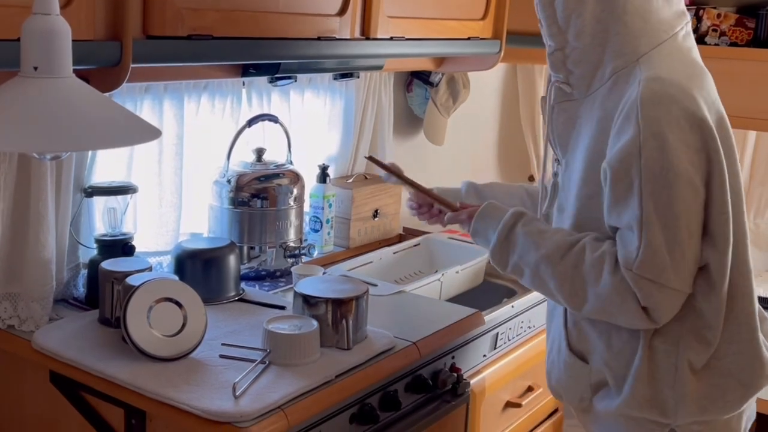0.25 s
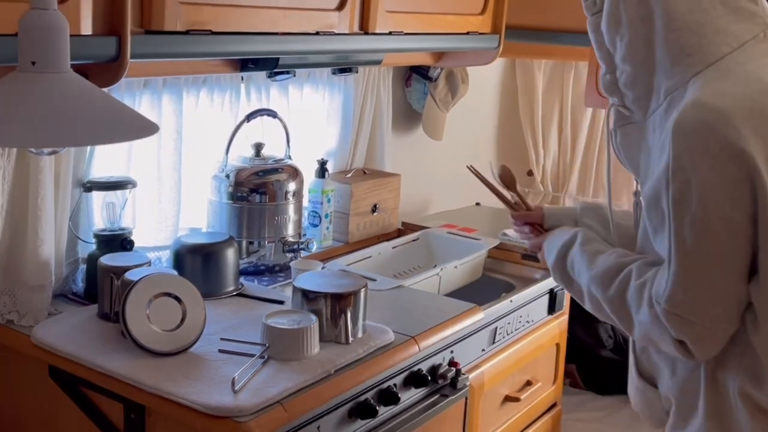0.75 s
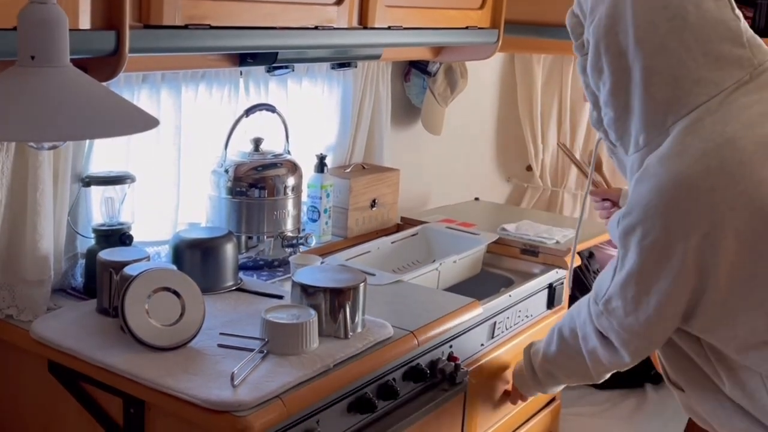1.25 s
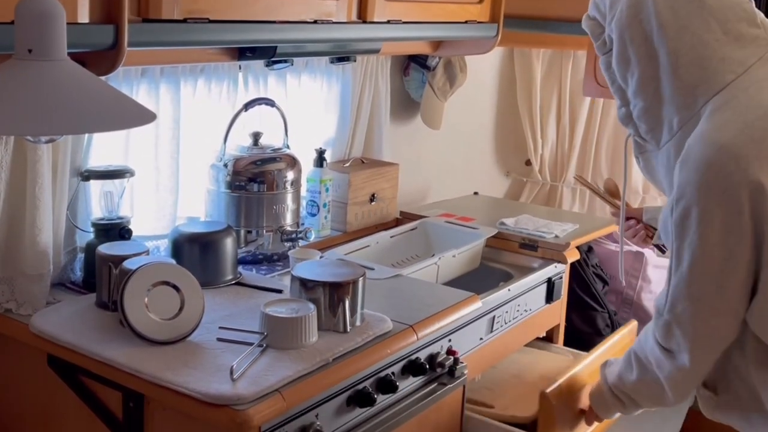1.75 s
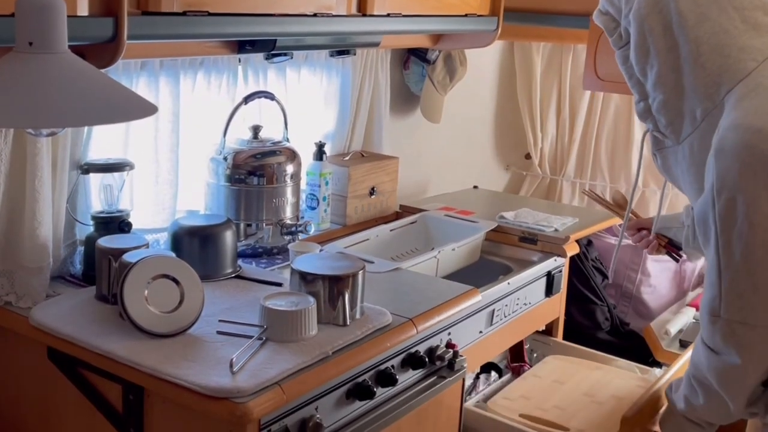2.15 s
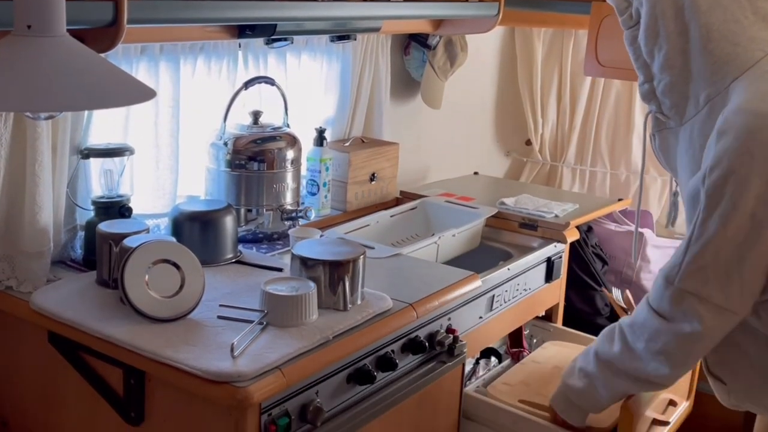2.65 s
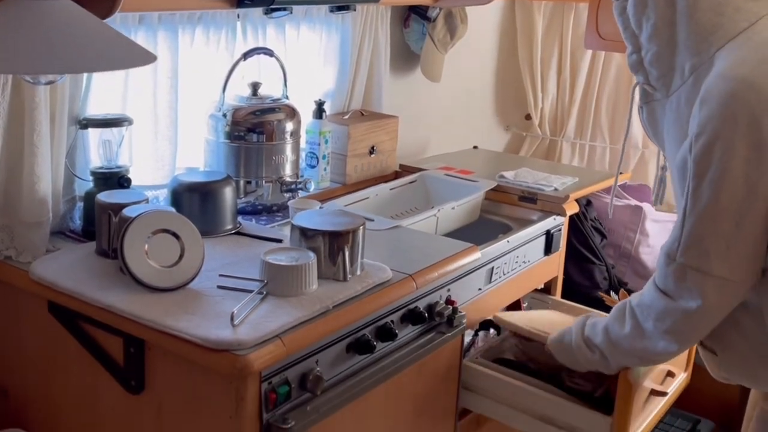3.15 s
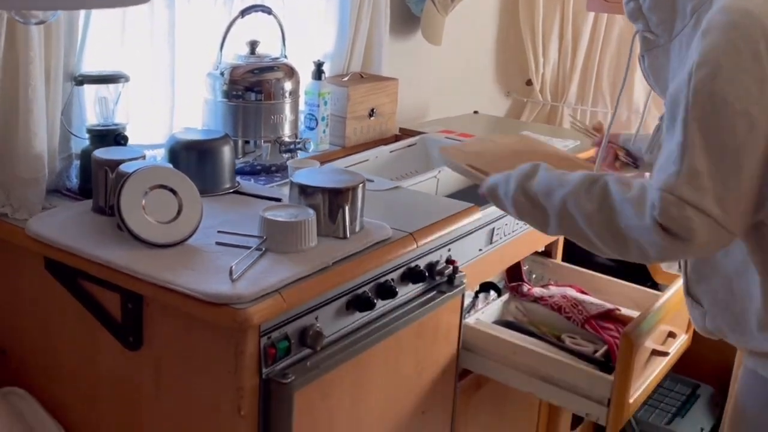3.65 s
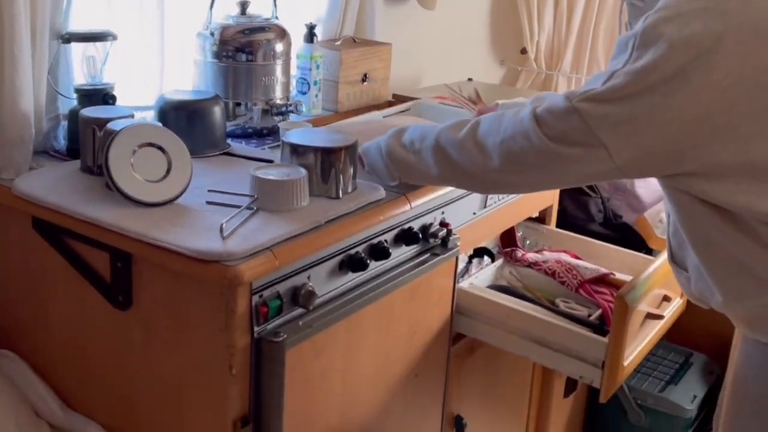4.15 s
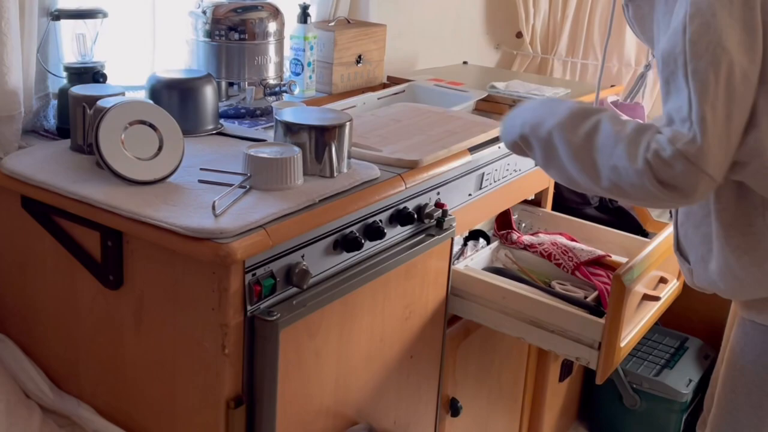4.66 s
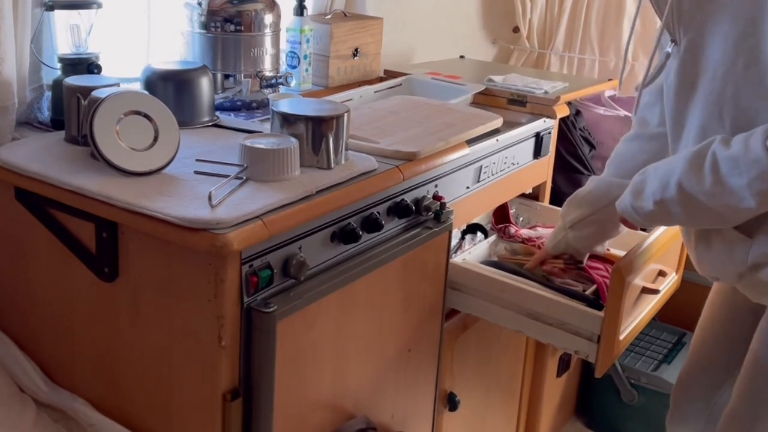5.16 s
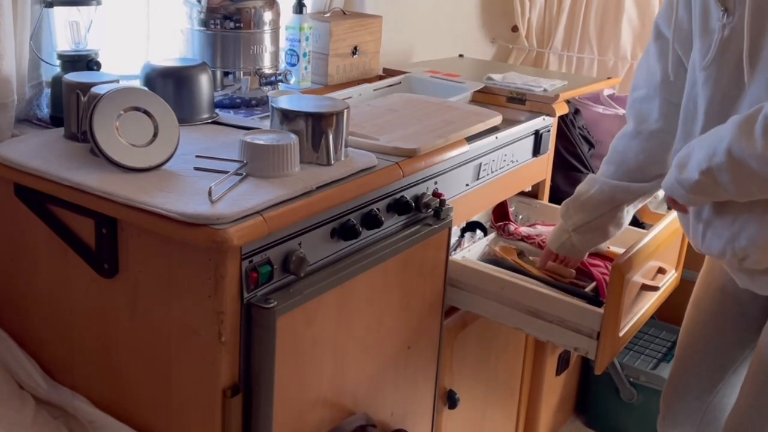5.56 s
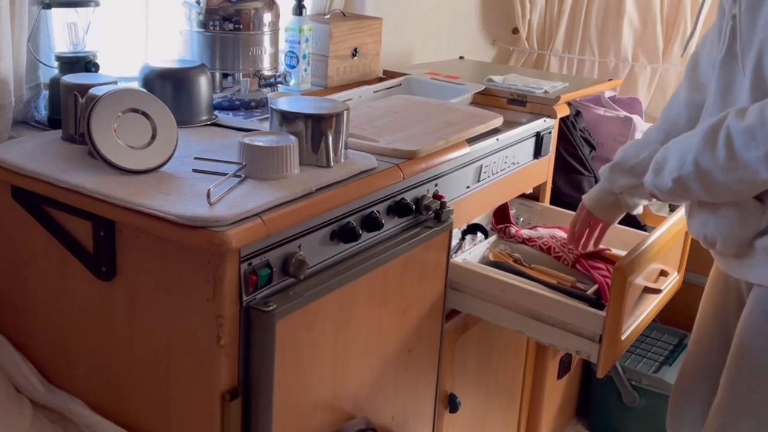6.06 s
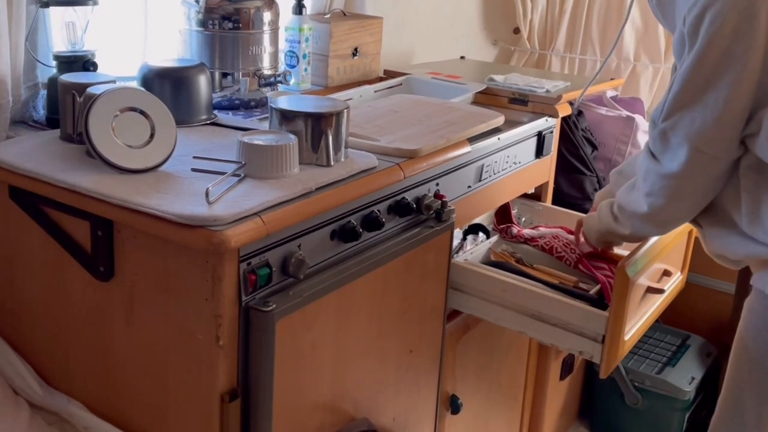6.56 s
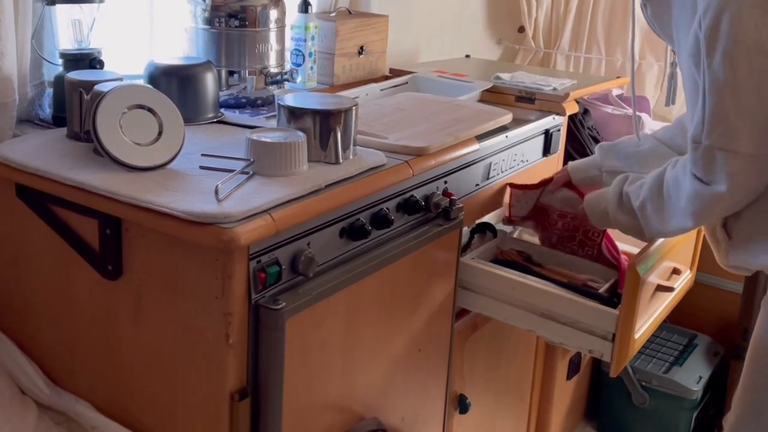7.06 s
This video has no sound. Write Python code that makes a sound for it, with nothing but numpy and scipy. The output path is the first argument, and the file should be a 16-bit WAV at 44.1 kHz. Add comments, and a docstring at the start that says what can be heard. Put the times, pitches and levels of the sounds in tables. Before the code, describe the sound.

In a small camper kitchen, light sticks and spoons click, a drawer slides to a thud, a board knocks onto the worktop, cutlery drops, fabric swishes.

```python
"""A small camper kitchen, soft inside and booming near 60 Hz, heard through two close phone ports.
Chopsticks and spoons tick, a drawer slides to its stop, a board is lifted and laid on the worktop,
the cutlery drops into the drawer and a cloth is pulled over it. Blows excite decaying modes with noise;
rubs and the slide are noise of sparse slips; squeaks, rings and booms are single modes or thin noise bands;
the drone is noise shaped by the cabin, and the walls answer by convolution."""
import sys
import numpy as np
from scipy import signal
from scipy.fft import rfft, irfft, next_fast_len
from scipy.io import wavfile
from scipy.ndimage import uniform_filter1d

SR = 44100
rng = np.random.default_rng(int(sys.argv[2]) if len(sys.argv) > 2 else 0)


def store_pcm(level_fs):
    """Save levels as 16-bit WAV."""
    pcm = np.round(np.clip(level_fs, -1, 1) * 32767).astype(np.int16)
    wavfile.write(sys.argv[1], SR, np.atleast_2d(pcm).T)


N = 322365
SIZE = next_fast_len(N + SR)  # transform length, with room for tails
HZ = np.maximum(np.fft.rfftfreq(SIZE, 1 / SR), 1)
TIME = np.arange(N) / SR
SIDES = np.array([[1], [-1]])  # left, right

# Levels in the tables hold ahead of the ports' response.
# cutlery contacts: (time [s], treble peak [dB], middle peak re treble [dB], lifted treble [Hz], contact t60 [s])
CUTLERY_CONTACTS = [(0.0653, -48, 1.5, 4630, 0.083), (0.1106, -26, -4, 3040, 0.07),
                    (0.4419, -40.5, -34, 4470, 0.031), (0.5434, -37, -13.5, 4700, 0.047),
                    (0.571, -38, -13.5, 4070, 0.17), (0.594, -25, -28, 5600, 0.024),
                    (0.8128, -27.5, -37, 5200, 0.007), (1.2136, -51, 1.5, 7560, 0.032),
                    (0.8928, -64, 3.5, 2940, .04), (1.372, -49, 5, 3050, .076),
                    (1.4063, -48, 3, 3500, .035), (1.44, -25.5, -18, 3800, 0.044),
                    (1.496, -38.5, -26, 3500, 0.056), (1.5354, -42, -0.5, 3440, 0.042),
                    (2.0591, -26, -1, 2480, 0.19), (2.0902, -23, -1.5, 3246, 0.19),
                    (2.1274, -41, 7.5, 2890, 0.086), (2.6456, -23.5, -12, 4920, 0.069),
                    (3.3367, -55, -4, 2830, .029), (3.6047, -49.5, -24.5, 4600, 0.025),
                    (3.7925, -55, -27, 9660, .035), (3.996, -58, -16, 8900, .039),
                    (4.015, -63, -17, 8900, 0.07), (4.0819, -39, 7, 2750, 0.15),
                    (4.2248, -52.5, -1.5, 2920, 0.1), (4.3613, -21.5, 2, 2810, 0.19),
                    (4.4919, -41.5, -3.5, 2700, 0.052), (4.562, -63.5, 11, 2970, 0.12),
                    (4.6028, -57.5, -1.5, 9000, 0.078), (4.724, -41, -22, 9070, 0.063),
                    (4.8592, -64, -21, 9300, .046), (4.9748, -56.5, -11, 9370, .045),
                    (5.0659, -37, -20, 9500, 0.044), (5.1032, -33, -12, 9600, 0.062),
                    (5.1258, -40, 8.5, 7500, 0.09), (5.1739, -48.5, 2.5, 8450, 0.056),
                    (5.2016, -42, -3, 3350, .045), (5.2486, -39, -35.5, 7210, 0.019),
                    (5.257, -31, -6, 3200, 0.078), (5.3025, -55, 1.5, 6760, 0.085),
                    (5.3513, -39.5, -3.5, 6090, 0.076), (5.4147, -17.5, -16, 8900, 0.06),
                    (5.4214, -16, -28.5, 7590, 0.018), (5.4284, -24, -8, 9130, 0.062),
                    (5.46, -24, -31, 5660, 0.1), (5.4708, -11.5, -20, 8450, 0.029),
                    (5.4754, -29.5, 1.5, 9130, 0.15), (5.4904, -20.5, -16.5, 8100, 0.043),
                    (5.5328, -25.5, -5, 3010, 0.18), (5.5504, -27, -5, 3437, 0.068),
                    (5.598, -29.5, -9.5, 8890, .043), (5.6227, -25.5, -7, 3564, 0.034),
                    (5.6648, -37, -2.5, 8600, 0.12), (5.6724, -19.5, -15, 6140, 0.072),
                    (5.6812, -31, 2.5, 4200, 0.15), (5.7161, -27, -18, 9200, 0.053),
                    (6.2971, -62.5, -11, 8310, 0.048)]
# cutlery shifting in the drawer between the clear contacts: (time [s], level [dB])
RATTLE_LEVEL = [(5.066, -58.5), (5.238, -64.5), (5.43, -56.5), (5.56, -40.5), (5.588, -57), (5.615, -47),
                (5.71, -56), (5.78, -89)]
# modes of sticks and spoons: (frequency [Hz], t60 [s])
CUTLERY_MODES = [(700, .02), (1000, .025), (1200, .03), (1507, .035), (1970, .02), (2400, .02),
                 (3050, .025), (3600, .02), (3950, .025), (4600, .015), (5300, .02), (6000, .015),
                 (6900, .02), (7680, .015), (8780, .02), (9300, .015), (11300, .015)]
TICK_MIDDLE_HZ = 1600  # centre of the lift in the middle band
TICK_PAN_DB, TICK_SCATTER_DB = 1, 1  # left minus right, and its spread from tick to tick

# wood on wood: (time [s], middle peak [dB], treble re middle [dB], bass re middle [dB],
# lifted middle [Hz], lifted bass [Hz], contact t60 [s])
WOOD_CONTACTS = [(0.471, -50, 1, 7, 1500, 205, 0.06), (1.445, -39, 5.5, 7.5, 856, 218, 0.028),
                 (1.664, -45.5, 4, 0, 1430, 212, 0.076), (1.69, -35, 4, 4.5, 850, 238, 0.094),
                 (2.054, -27.5, 1.5, -2.5, 846, 218, 0.076), (2.066, -22, -5.5, 2, 654, 175, 0.094),
                 (2.085, -29.5, 3.5, 0, 835, 131, 0.054), (2.099, -26, -3, -0.5, 800, 233, 0.12),
                 (2.122, -43, -1.5, 0.5, 1000, 180, 0.17), (2.160, -40, 6.5, 4, 860, 213, 0.053),
                 (2.317, -36.5, -0.5, -14, 1330, 227, 0.055), (2.411, -51.5, -6, 2.5, 1450, 181, 0.13),
                 (2.607, -39.5, -3, 0, 840, 380, 0.14), (2.647, -39.5, 10, -7, 1400, 297, 0.076),
                 (2.823, -51.5, -7.5, -8.5, 1480, 140, 0.13), (2.892, -38, -9, -3.5, 750, 228, 0.084),
                 (2.924, -47, -2, -0.5, 625, 238, 0.22), (3.001, -39, -8.5, 3.5, 590, 313, 0.091),
                 (4.084, -30.5, -7.5, -8, 595, 284, 0.084), (4.101, -27.5, -8, 4, 537, 185, 0.17),
                 (4.321, -21.5, 4.5, -4, 1090, 208, 0.086), (4.363, -18.5, -5.5, -2, 1030, 214, 0.076),
                 (4.388, -17, -2, -6.5, 1234, 177, 0.088), (4.407, -29.5, -7, -1, 800, 340, 0.18),
                 (4.446, -43, -18, 13, 603, 201, 0.044), (4.51, -45.5, -6, 5.5, 630, 264, 0.055),
                 (4.578, -46.5, -6, -1, 585, 200, 0.044), (4.643, -44, -29, -2, 574, 274, 0.087),
                 (4.889, -50.5, -23, -31, 617, 154, 0.21), (4.912, -52, -22, 16, 690, 160, 0.18),
                 (6.634, -45, -33, -6.5, 620, 244, 0.21), (6.728, -49, -24, -19, 630, 137, 0.042),
                 (7.019, -37, -7, -37, 1360, 184, 0.15), (7.036, -40, -5, -18, 737, 164, 0.056),
                 (7.247, -49.5, -22, -16, 626, 186, 0.14)]
# modes of drawer, board and worktop: (frequency [Hz], t60 [s])
WOOD_MODES = [(140, .12), (189, .2), (228, .15), (272, .12), (320, .1), (375, .08), (593, .06), (684, .05),
              (776, .05), (868, .04), (967, .04), (1050, .04), (1141, .04), (1340, .03), (1520, .03),
              (1780, .025), (1975, .025), (2283, .02), (2700, .02), (3150, .015), (3500, .015), (4300, .01)]
KNOCK_PAN_DB = 1  # left minus right

# Single modes; the level is that of the decay ahead of its gradual onset.
# loose metal pieces left singing: (time [s], level [dB], pitch [Hz], t60 [s])
METAL_RINGS = [(0.0, -70, 2470, 0.21), (.130, -58.5, 5170, 0.25), (.615, -66, 3130, 0.71),
               (2.160, -31.5, 2118, 0.026), (2.190, -60, 855, 0.53), (4.130, -52.5, 862, 0.67),
               (4.235, -67, 2920, 0.26), (4.726, -48.5, 5210, .07)]
# the runners catch and squeak: (time [s], level [dB], pitch [Hz], t60 [s])
RUNNER_SQUEAKS = [(1.555, -46, 1570, 0.12), (1.585, -34.5, 1890, 0.056), (1.600, -47, 1510, 0.056),
                  (1.650, -42, 1530, 0.15), (1.810, -46, 854, 0.16)]
# jolts of the cabin floor: (time [s], level [dB], pitch [Hz], t60 [s])
FLOOR_JOLTS = [(1.481, -37.5, 61, 0.33), (1.710, -35, 64.6, 0.43), (2.059, -22, 99.6, 0.22),
               (2.109, -17, 53.8, 0.1), (4.359, -38, 70.2, 0.5), (4.916, -27, 56.5, 0.28),
               (4.949, -32.5, 56.5, 0.47), (4.999, -37.5, 59, 0.72)]

# strokes of hands, sleeves, board and cloth: (time [s], length [s], hiss level at the start [dB],
# hiss level at the end [dB], body level re hiss [dB])
RUB_STROKES = [(0.0, 0.064, -63, -74, 6), (0.062, 0.097, -53, -68, -3), (0.178, 0.16, -66.5, -89.5, 7.5),
               (0.378, 0.058, -87, -86, 21), (0.449, 0.12, -59.5, -85, 3.5), (0.605, 0.24, -74.5, -72, 1),
               (1.01, 0.073, -77, -82, 12), (1.183, 0.047, -88, -84, 18), (1.48, 0.56, -60, -62, -2.5),
               (2.146, 0.12, -49.5, -67, -1), (2.232, 0.12, -85.5, -70.5, 8),
               (2.414, 0.054, -76, -70, -10.5), (2.677, 0.24, -75.5, -78, 4), (2.837, .15, -51, -60, -6.5),
               (2.981, .27, -57, -53, -7.5), (3.703, 0.07, -68, -83, -10),
               (4.115, 0.078, -56.5, -77.5, 9.5), (4.195, 0.13, -88.5, -69.5, 12),
               (4.41, 0.047, -61.5, -82, 27.5), (4.51, .12, -88, -90, 13), (4.9, 0.059, -77, -90, 17),
               (5.86, 0.046, -84, -97, 20), (6.065, 0.161, -92, -94, 12), (6.302, 0.088, -90, -94, 11),
               (6.558, .17, -52.5, -55, -7.5), (6.778, 0.094, -61, -60.5, -12), (6.89, 0.15, -60, -55, -11),
               (7.048, 0.17, -58.5, -75.5, -5.5), (7.22, .08, -71, -84.5, -0.5)]
STROKE_ATTACK_S, STROKE_RELEASE_T60_S = 0.034, 0.19
FLUTTER_DB, FLUTTER_S = 1, .03  # spread of the random levels ahead of slewing; time each is held
STIR_DB = -88.5  # sleeves stir faintly all the time
SLEEVE_HZ, SLEEVE_WIDTH_HZ, SLEEVE_DB = 1540, 400, -8  # resonance in the body of a rub

# drawer on its runners: (time [s], level [dB])
SLIDE_LEVEL = [(1.34, -78), (1.428, -51), (1.55, -58.5), (1.618, -61), (1.834, -58.5), (2.004, -61.5),
               (2.08, -52.5)]
# resonances of the drawer box: (frequency [Hz], width [Hz], level [dB])
BOX_RESONANCES = [(860, 160, -7), (1300, 150, -6), (1520, 250, 0), (1870, 200, -5), (2250, 300, -6),
                  (3130, 300, -13)]

# faint held squeaks: (time [s], length [s], tones as (frequency [Hz], rms level [dB]))
RUBBED_TONES = [(2.448, 0.044, [(2137, -69), (2789, -82), (3655, -83), (5001, -72), (6196, -79)]),
                (3.685, 0.11, [(2336, -81), (3542, -78), (4834, -86), (5233, -92)])]
CHIRP_EDGE_S, CHIRP_WAVER_HZ = .012, 29.4  # fade at each end; half width of each band

# cabin rumble: (time [s], level [dB])
RUMBLE_LEVEL = [(0.0, -44.5), (0.25, -49), (1.08, -49), (2.14, -45.5), (2.36, -48.5), (2.65, -55),
                (3.03, -51.5), (3.46, -56), (4.38, -55), (4.55, -48), (4.89, -58.5), (5.05, -48),
                (5.25, -53), (5.64, -52), (6.05, -60), (6.94, -56.5), (7.31, -58.5)]
# relative spectrum of the rumble in the cabin: (frequency [Hz], density [dB per Hz])
CABIN_SPECTRUM = [(12, -51.5), (20, -27.5), (63, 0.5), (96, -18.5), (160, -18), (232, -20), (272, -29.5),
                  (305, -26), (343, -32.5), (905, -39.5), (1690, -47), (5000, -62.5), (6500, -100.5),
                  (11000, -120)]

# decay of the wall sound: (frequency [Hz], t60 [s])
ROOM_DECAY = [(100, 0.61), (1000, 0.075), (10000, 0.09)]
# strength of the wall sound: (frequency [Hz], level re direct [dB])
ROOM_LEVEL = [(100, -10), (500, -3), (1500, -2), (5000, -3), (10000, -7)]
# likeness of diffuse sound, left against right: (frequency [Hz], likeness [0-1])
DIFFUSE_LIKENESS = [(60, .99), (250, .8), (600, .55), (1400, .1), (7000, .2), (8500, .9), (11000, .8),
                    (16000, .5)]

# response common to both ports: (frequency [Hz], gain [dB])
PORT_RESPONSE = [(20, 6), (3800, -0.5), (5200, 0), (7000, 0), (8700, 4), (10200, 10), (11400, 9),
                 (12500, -9), (13300, -24), (16000, -27)]
# phase by which the left port leads: (frequency [Hz], lead [radians])
PORT_PHASE_LEAD = [(20, 0), (200, .1), (900, -.4), (2400, .3), (5000, .6), (6500, .1), (7700, .9),
                   (8600, 0), (10200, -3.14), (11800, -5.6), (12600, -7), (13300, -7.4), (16000, -7.4)]
# balance of the ports: (frequency [Hz], left minus right [dB])
PORT_LEVEL_BALANCE = [(30, -2), (300, 1), (1400, 1.5), (3000, 2.5), (8000, 0.5)]
TOP_HZ = 15900  # edge of the final low-pass


def cutlery():
    """Modal impact: light sticks and spoons tick bright and short; slips rattle while the handful settles."""
    out = np.zeros((2, N))
    for s, treble_db, middle_db, treble_hz, t60 in CUTLERY_CONTACTS:
        tick = blow(CUTLERY_MODES, t60, rise_s=0.0009, crack_db=49, scatter_db=1.5, chatter_db=-8, uneven_db=2.0)
        treble = part(tick, 2500, 24000, treble_db, treble_hz)
        middle = part(tick, 820, 2000, treble_db + middle_db, TICK_MIDDLE_HZ)
        add(out, s, treble + middle, TICK_PAN_DB + TICK_SCATTER_DB * rng.standard_normal())
    answer = body(CUTLERY_MODES, TIME[:SR // 20], crack_db=50, scatter_db=2.5)
    rattle = signal.fftconvolve(grit(2.2, .15), answer)[:N]
    return out + amp(over_time(RATTLE_LEVEL)[0]) * unit(band(rattle, 620, 8000))


def woodwork():
    """Damped panel modes: drawer, board and worktop answer a blow low and dry."""
    out = np.zeros((2, N))
    for s, middle_db, treble_db, bass_db, middle_hz, bass_hz, t60 in WOOD_CONTACTS:
        knock = blow(WOOD_MODES, t60, rise_s=0.0022, crack_db=51, scatter_db=1.96, chatter_db=-9.5, uneven_db=3.5)
        middle = part(knock, 500, 1500, middle_db, middle_hz)
        treble = part(band(knock, 1200, 5500), 1500, 4500, middle_db + treble_db, 2100)
        # the bass is the same at both ports
        bass = part(knock.mean(axis=0, keepdims=True), 150, 480, middle_db + bass_db, bass_hz)
        add(out, s, middle + treble + bass, KNOCK_PAN_DB)
    return out


def rubbing():
    """Friction noise: fibres slip in a fine hiss; the rubbed things add a duller, scratchier body."""
    hiss_gain, body_gain = np.zeros(N), np.full(N, amp(STIR_DB))
    for s, length, start_db, end_db, body_db in RUB_STROKES:
        t = TIME - s
        attack = np.clip(t / STROKE_ATTACK_S, 0, 1) ** 2
        release = fade(np.maximum(t - length, 0), STROKE_RELEASE_T60_S)
        stroke = attack * release * amp(np.interp(t, [0, length], [start_db, end_db]))
        # overlapping strokes add in power
        hiss_gain = np.hypot(hiss_gain, stroke)
        body_gain = np.hypot(body_gain, amp(body_db) * stroke)
    hiss = unit(band(grit(1.0, .4), 3600, 18000))
    scrape = unit(band(grit(1.8, .3), 450, 3200))
    sleeve = unit(band(scrape, SLEEVE_HZ - SLEEVE_WIDTH_HZ / 2, SLEEVE_HZ + SLEEVE_WIDTH_HZ / 2))
    scrape = unit(scrape + amp(SLEEVE_DB) * sleeve)
    return flutter() * hiss_gain * hiss + flutter() * body_gain * scrape


def drawer_slide():
    """Stick-slip excitation: slips on the runners ring the resonances of the drawer box."""
    slips = flutter() * grit(3.2, .15)
    box = sum(amp(db) * unit(band(slips, hz - width / 2, hz + width / 2)) for hz, width, db in BOX_RESONANCES)
    scrape = unit(band(slips, 300, 2500))
    return amp(over_time(SLIDE_LEVEL)[0]) * unit(unit(box) + amp(5.0) * scrape)


def squeaks():
    """Friction-driven mode: a catching runner swells gently into one decaying tone."""
    return single_modes(RUNNER_SQUEAKS, rise_s=0.0098)


def rings():
    """Free vibration: each loose metal piece is left singing on one mode with a sharp onset."""
    return single_modes(METAL_RINGS, rise_s=0.00053)


def booms():
    """Cabin resonance: each jolt of the floor rings one low decaying mode."""
    return single_modes(FLOOR_JOLTS, rise_s=0.0023)


def chirps():
    """Narrow-band noise: something rubbed sings for a moment, each tone a thin wavering band."""
    out = np.zeros(N)
    for s, length, tones in RUBBED_TONES:
        gate = np.clip(np.minimum(TIME - s, s + length - TIME) / CHIRP_EDGE_S, 0, 1)
        for hz, db in tones:
            tone = unit(band(rng.standard_normal(N), hz - CHIRP_WAVER_HZ, hz + CHIRP_WAVER_HZ))
            out += amp(db) * gate * tone
    return out


def rumble():
    """Modal colouring of noise: an outside drone is shaped by the cabin's low modes."""
    level_db = over_time(RUMBLE_LEVEL)[0] + .5 * SIDES
    return amp(level_db) * unit(diffuse(over_hz(CABIN_SPECTRUM)))


def room():
    """Diffuse reverberation: octave bands of noise at each port fade at their own rates."""
    t, noise, tail = TIME[:SR // 2], diffuse(0)[:, :SR // 2], 0
    for hz in 125 * 2. ** np.arange(8):
        shape = fade(t, over_hz(ROOM_DECAY, hz)) * np.minimum(t / .0015, 1)
        shape = shape / np.sqrt(np.sum(shape ** 2))  # unit energy
        octave = band(noise, hz / np.sqrt(2), min(hz * np.sqrt(2), 20000))
        tail = tail + amp(over_hz(ROOM_LEVEL, hz)) * octave * shape
    return tail


def diffuse(shape_db):
    """Spatial coherence: a shaped noise pair is as alike as the ports hear a diffuse field."""
    like = np.clip(over_hz(DIFFUSE_LIKENESS), 0, 1)
    mid, side = rfft(rng.standard_normal((2, SIZE))) * amp(shape_db)
    pair = np.sqrt(1 + like) * mid + np.sqrt(1 - like) * side * SIDES
    return irfft(pair, SIZE)[:, :N] / np.sqrt(2)


def blow(modes, contact_t60, rise_s, crack_db, scatter_db, chatter_db, uneven_db):
    """Impact excitation: a first strike, then uneven chatter that dies away, drives a modal body."""
    t = np.arange(int(SR / 4)) / SR
    steps = np.repeat(rng.standard_normal(len(t) // 64 + 1), 64)[:len(t)]
    chatter = amp(chatter_db) * amp(uneven_db * steps) * fade(t, max(contact_t60, .004))
    strike = fade(t, 0.0061)
    shape = (chatter + strike) * (1 - np.exp(-t / rise_s))
    # the contact comes from many spots, so each port hears it a little differently
    shared, apart = rng.standard_normal((2, len(t)))
    push = (shared + amp(-5) * apart * SIDES) * shape
    answer = body(modes, t, crack_db, scatter_db)[None]
    return signal.fftconvolve(push, answer, axes=1)[:, :len(t)]


def body(modes, t, crack_db, scatter_db):
    """Modal superposition: one click gives a broad crack plus modes, each caught differently every time."""
    hz, t60 = np.transpose(modes)[:, :, None]
    level_chance, pitch_chance = rng.standard_normal((2, len(modes), 1))
    # short-lived modes start stronger, so all carry alike energy
    start = amp(scatter_db * level_chance) / np.sqrt(t60)
    tone = np.sin(2 * np.pi * hz * (1 + 0.029 * pitch_chance) * t)
    ring = (start * fade(t, t60) * tone).sum(axis=0)
    ring[0] = amp(crack_db)
    return ring


def part(sound, lo_hz, hi_hz, peak_db, loud_hz):
    """Band-wise radiation: one band of a blow has its own peak, lifted where the spot struck rings most."""
    piece = band(sound, lo_hz, hi_hz)
    piece = piece + amp(1) * band(piece, loud_hz * .8, loud_hz / .8)
    return amp(peak_db) * piece / np.abs(piece.mean(axis=0)).max()


def single_modes(table, rise_s):
    """Damped oscillation: each event sings on one mode with a gradual onset and exponential decay."""
    out, t = np.zeros((2, N)), np.arange(int(SR / 2)) / SR
    for s, db, hz, t60 in table:
        envelope = (1 - np.exp(-t / rise_s)) * fade(t, t60)
        add(out, s, amp(db) * envelope * np.sin(2 * np.pi * hz * t))
    return out


def grit(sizes_db, share):
    """Stochastic slip: noise made of sparse slips whose sizes have a long tail."""
    slips = rng.standard_normal(N) * (rng.random(N) < share)
    return unit(slips * amp(sizes_db * rng.exponential(size=N)))


def flutter():
    """Amplitude modulation: uneven pressure as random levels, each slewed into the next."""
    k = int(FLUTTER_S * SR)
    held = np.repeat(rng.standard_normal(N // k + 1), k)
    return amp(FLUTTER_DB * uniform_filter1d(held, k)[:N])


def fade(t, t60):
    """Exponential decay: falls 60 dB in t60."""
    return np.exp(-np.log(1000) * t / t60)


def add(out, s, sound, pan_db=0.):
    """Superposition: mix one event into the stereo track, with pan as left minus right."""
    i = int(s * SR)
    sound = sound[..., :N - i]
    out[:, i:i + sound.shape[-1]] += amp(pan_db * SIDES / 2) * sound


def band(x, lo_hz, hi_hz):
    """Band-pass filtering along the last axis."""
    edges = [lo_hz, min(hi_hz, .45 * SR)]
    return signal.sosfilt(signal.butter(2, edges, "band", fs=SR, output="sos"), x)


def unit(x):
    """Power normalisation: scale to rms 1."""
    return x / np.sqrt(np.mean(x ** 2))


def amp(db):
    """Logarithmic level: decibels to amplitude gain."""
    return 10 ** (np.asarray(db) / 20)


def over_hz(table, hz=HZ):
    """Logarithmic frequency scale: read (frequency, value) rows on a log axis."""
    return np.interp(np.log(hz), np.log(np.array(table)[:, 0]), np.array(table)[:, 1])


def over_time(table):
    """Linear interpolation: columns of a level curve, sample by sample; -120 dB outside it."""
    s, *columns = np.transpose(table)
    return [np.interp(TIME, s, c, left=-120, right=-120) for c in columns]


def scene():
    """Direct and reverberant field: worktop sounds arrive directly and again by the walls, over the rumble."""
    near = cutlery() + woodwork() + rings() + squeaks() + booms()
    near = near + amp(0.68 * SIDES) * (rubbing() + drawer_slide() + chirps())
    middle = near.mean(axis=0)
    walls = irfft(rfft(middle, SIZE) * rfft(room(), SIZE), SIZE)[:, :N]
    # the two ports share the top treble, so direction fades there
    low_pass = signal.butter(2, 7500, fs=SR, output="sos")
    side = signal.sosfiltfilt(low_pass, near[0] - near[1]) / 2
    return middle + SIDES * side + amp(0.6 * SIDES) * walls + rumble()


def record(dry):
    """Port resonance: treble is coloured and the sides turned in phase; faint hiss is added, the top cut."""
    hiss = amp(-83) * diffuse(0)
    # causal response from the folded cepstrum of the log gain
    cepstrum = irfft(np.log(amp(over_hz(PORT_RESPONSE))), SIZE)
    cepstrum[1:SIZE // 2] *= 2
    cepstrum[SIZE // 2 + 1:] = 0
    turn = .5j * SIDES * over_hz(PORT_PHASE_LEAD)
    balance = amp(SIDES * over_hz(PORT_LEVEL_BALANCE) / 2)
    ports = np.exp(rfft(cepstrum) + turn) * balance
    coloured = irfft(rfft(dry + hiss, SIZE) * ports, SIZE)[:, :N]
    return signal.sosfilt(signal.ellip(8, .2, 70, TOP_HZ, fs=SR, output="sos"), coloured)


dry = scene()
out = record(dry)
store_pcm(out)
```